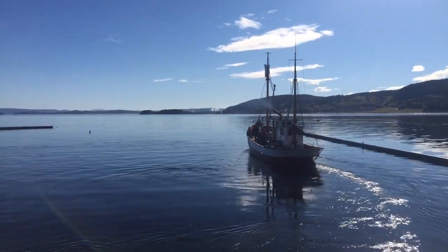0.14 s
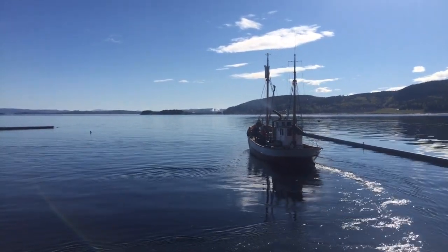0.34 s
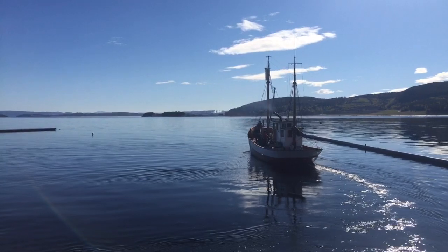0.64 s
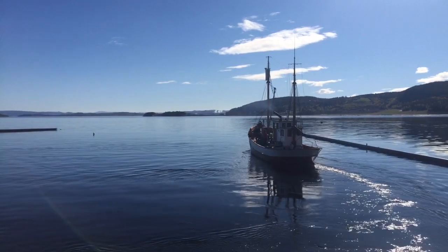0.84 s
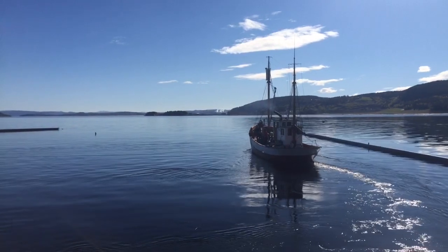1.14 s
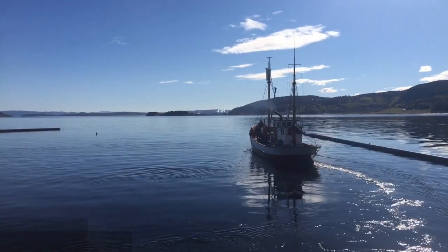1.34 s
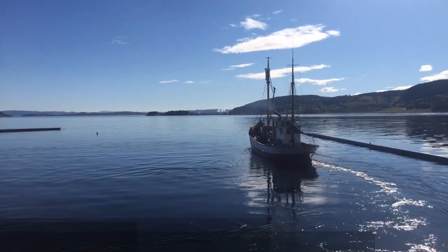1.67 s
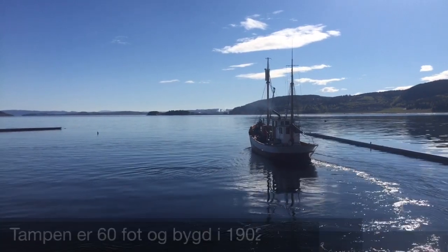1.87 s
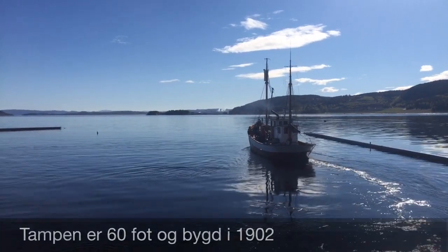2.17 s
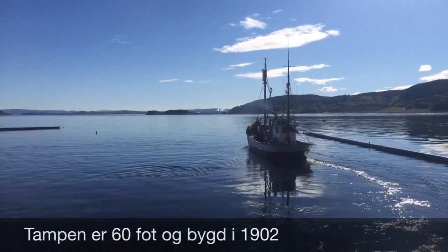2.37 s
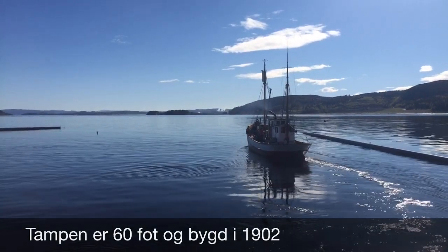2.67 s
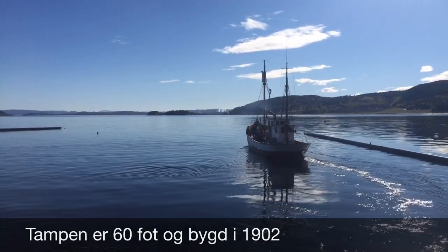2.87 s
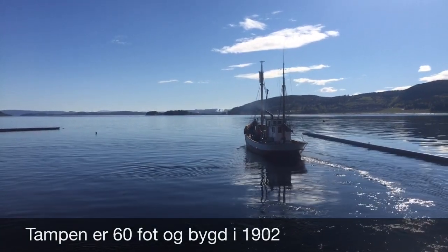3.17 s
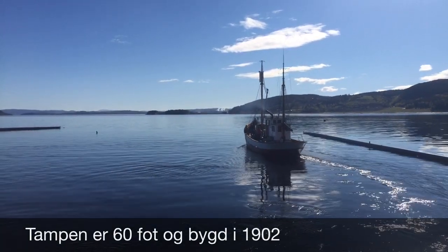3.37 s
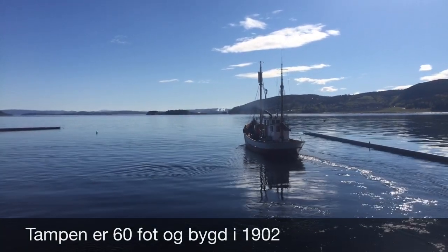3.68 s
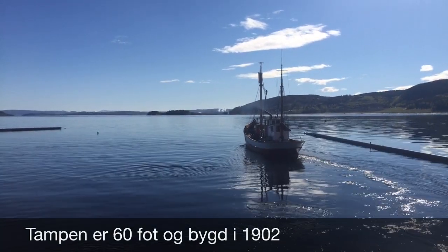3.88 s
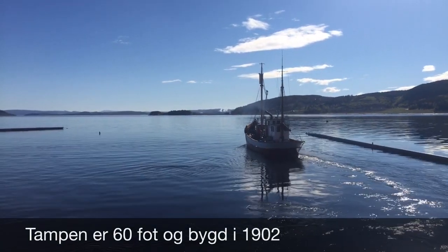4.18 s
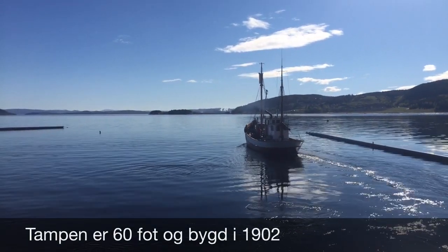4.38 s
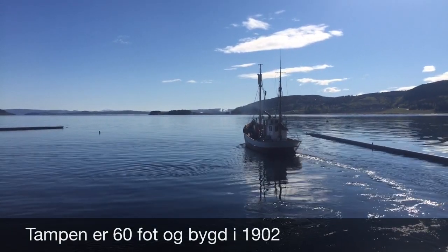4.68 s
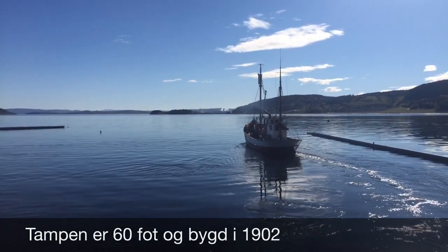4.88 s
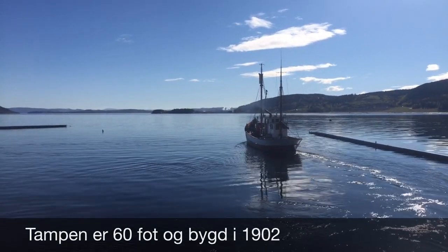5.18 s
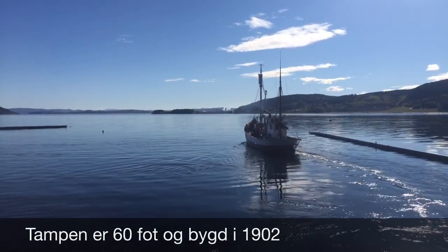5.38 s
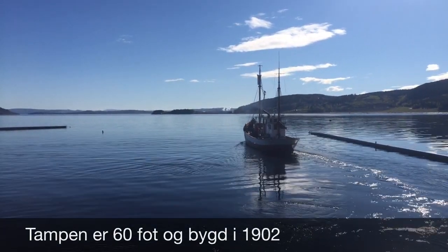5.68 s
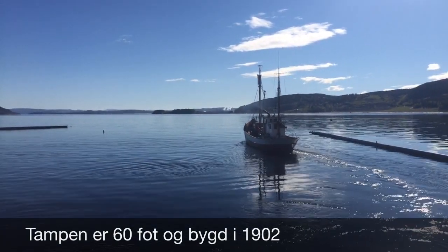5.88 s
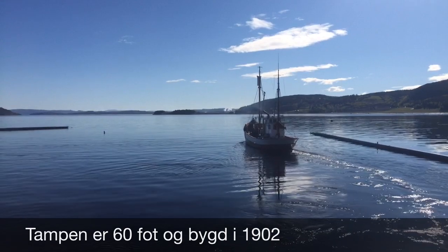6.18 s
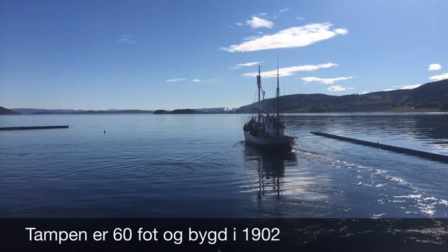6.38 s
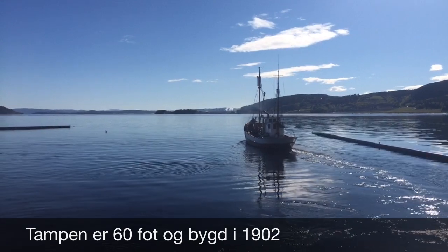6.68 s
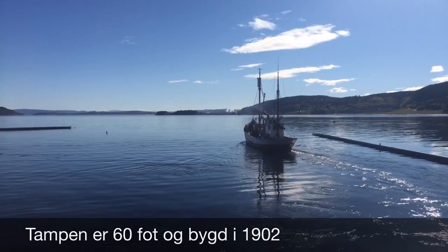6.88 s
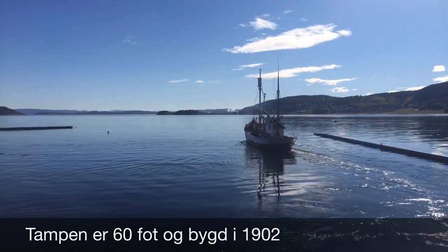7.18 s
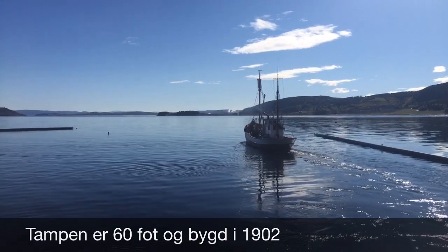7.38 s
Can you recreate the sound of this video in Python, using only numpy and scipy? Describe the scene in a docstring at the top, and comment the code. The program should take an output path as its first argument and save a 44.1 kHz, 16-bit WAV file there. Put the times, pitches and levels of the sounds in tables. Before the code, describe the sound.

An old two-cylinder boat engine knocks steadily, hollow thud and iron clank, slowly receding over calm water with a faint fizzing wake.

```python
"""An old two-cylinder hot-bulb engine knocks evenly in a wooden fishing boat moving off over calm water. From
the start filtered noise makes gear churn, wake fizz and faint hiss; puffs keep the exhaust pipe booming. The
cylinders fire in turn: shaped noise swells into a hollow thud, an iron clank and a short crack, which repeat in
quick echoes and echo off the water. Splashes soon join, and a pump ticks once a revolution. The water echo
closes in and the knock's colour slowly rises; late on, one small wave spills over with a hiss."""
import sys
import numpy as np
from scipy import signal
from scipy.fft import rfft, irfft, next_fast_len
from scipy.io import wavfile
from scipy.ndimage import uniform_filter1d

SR = 44100
rng = np.random.default_rng(int(sys.argv[2]) if len(sys.argv) > 2 else 0)


def pcm_store(signal):
    """Save signal as 16-bit PCM."""
    levels = np.round(np.clip(np.atleast_2d(signal), -1, 1) * 32767)
    wavfile.write(sys.argv[1], SR, levels.astype(np.int16).T)


N = 332073
RUN_IN = SR  # samples of sound made ahead of time zero and cut off at the end
KNOCK_LENGTH = 8192  # samples in one short sound
TIME = np.arange(-RUN_IN, N) / SR  # seconds

# The small blows inside one firing. Each row: delay in seconds, then the relative strength in dB
# of the blow in the swell, the thud, the clank and the crack.
BLOWS = [(-.02, 7.5, -44, -27, -40), (-.006, 1, -7, -52, -25), (.001, -30, -0.5, 5.5, 4),
         (.0055, -30, 2, 2.5, 2), (0.038, -40, -4.5, -8, -36)]
# Bright colour of the crack and the pump tick. Each row: frequency in Hz, strength in dB per Hz.
CRACK_COLOUR = [(1800, -1), (2400, 8.5), (3200, 4.5), (4300, 6), (5000, 0), (5900, -17), (8000, -17),
                (14000, -69)]
# Bright colour of splashing water. Each row: frequency in Hz, strength in dB per Hz.
SPLASH_COLOUR = [(3000, -10), (4500, 8), (6000, -7), (8000, 8), (10000, -14), (12000, -13), (15500, -24)]


def from_db(db):
    """Turn decibels into a gain."""
    return 10 ** (np.asarray(db) / 20)


def rms_one(x):
    """Scale each row to an rms (average strength) of 1."""
    return x / np.sqrt(np.mean(x ** 2, axis=-1, keepdims=True) + 1e-20)


def level(curve):
    """Gain over time, in straight dB lines between rows of (seconds, dB)."""
    seconds, db = np.transpose(curve)
    return from_db(np.interp(TIME, seconds, db))


def coloured(x, spectrum, peak_hz=1000, width_hz=100, peak_db=0):
    """Filter x to a given spectrum, with one resonance on top, and scale it to rms 1."""
    length = x.shape[-1]
    size = next_fast_len(length)
    hz = np.maximum(np.fft.rfftfreq(size, 1 / SR), 1)
    points, dbs = np.transpose(spectrum)
    shape_db = np.interp(np.log(hz), np.log(points), dbs)
    # beyond its two ends the spectrum falls away steeply
    low_skirt = np.minimum(hz / points[0], 1) ** 2
    high_skirt = np.minimum(points[-1] / hz, 1) ** 4
    resonance = 1 + (from_db(peak_db) - 1) / np.hypot(1, 2 * (hz - peak_hz) / width_hz)
    gain = from_db(shape_db) * low_skirt * high_skirt * resonance
    return rms_one(irfft(rfft(x, size) * gain, size)[..., :length])


def drift(rate):
    """Random wandering: straight lines between `rate` random points a second, points of spread 1."""
    knots = rng.standard_normal(4096)
    return np.interp((TIME - TIME[0]) * rate, np.arange(len(knots)), knots)


def firings(count=48, lead_count=6):
    """Time and cylinder of every firing; the engine is already running and gains a little speed."""
    first_s, beat_s = .1148, .1586  # first firing, and time to the next
    quickening_s = .000091  # how much shorter each beat is than the last
    stroke = np.arange(-lead_count, count)
    return first_s + beat_s * stroke - quickening_s * stroke ** 2 / 2, stroke % 2


def place(rows, times):
    """Lay one short sound at each time, adding where they overlap."""
    out = np.zeros(len(TIME) + 2 * KNOCK_LENGTH)
    starts = np.round(times * SR).astype(int) + RUN_IN
    for row, start in zip(rows, starts):
        out[start:start + len(row)] += row
    return out[:len(TIME)]


def rattle(count, alike):
    """Noise for each firing; each one partly repeats the one before."""
    alike = np.clip(alike, 0, .97)
    rows = rng.standard_normal((count, KNOCK_LENGTH))
    for k in range(1, count):
        rows[k] = alike * rows[k - 1] + np.sqrt(1 - alike ** 2) * rows[k]
    return rows


def over_water(x):
    """The calm surface mirrors the sound; the detour shrinks as the distance grows."""
    start_lag_s, echo_db = 0.00335, -8.5
    receding_per_s = 0.059  # share of the starting distance added each second
    lag_s = start_lag_s / (1 + receding_per_s * TIME)
    return x + from_db(echo_db) * np.interp(TIME - lag_s, TIME, x)


def gear():
    """Running gear and propeller churn as wavering noise; its colour shifts as the boat moves off."""
    # Colour of the churn. Each row: frequency in Hz, strength near in dB per Hz, strength far in dB per Hz.
    churn_colour = np.array([(40, -18, -28), (60, -33, -8.5), (89, -15, -7), (121, -1, -13),
                             (176, 0.5, 4.5), (320, -3.5, -4.5), (327, 2.5, -11), (373, -13.5, -13),
                             (534, -4.5, -9.5), (653, -2.5, -6.5), (883, -11.5, -12), (1320, -9.5, -12),
                             (2020, -16.5, -17.5), (2250, -29, -29.5), (3500, -39, -36)])
    # Loudness of the churn. Each row: time in seconds, level in dB before a 2 dB cut.
    churn_curve = [(0.0, -28), (1.64, -30), (2.64, -29.5), (5.16, -30.5), (7.53, -32)]
    away = np.clip(TIME / TIME[-1], 0, 1)
    stirring = rng.standard_normal(len(TIME)) * from_db(2.0 * drift(90))
    near = coloured(stirring, churn_colour[:, :2])
    far = coloured(stirring, churn_colour[:, ::2])
    return from_db(-2.0) * level(churn_curve) * ((1 - away) * near + away * far)


def exhaust(uneven_db=3.5, gust_s=0.0027):
    """Puffs ring the pipe, whose nearly even modes make each puff return about every 26 ms."""
    # Ringing tones of the pipe. Each row: frequency in Hz, level near in dB, level far in dB,
    # time to die by 60 dB in seconds, strength of turbulent noise driving the tone in dB.
    pipe_modes = [(44.25, -63, -56.5, 1.8, -32), (76.56, -40, -53.5, 0.76, -36),
                  (114.14, -41, -34.5, 0.76, -43), (153.2, -50.5, -39, 0.56, 7.5),
                  (189, -40, -54, 0.88, -11), (230.2, -32, -50, 0.36, -11.5), (281, -32, -34, 0.17, -15),
                  (292.4, -32.5, -44, 0.18, 10.5), (336.5, -49.5, -42.5, 0.38, 9.5),
                  (453.5, -51.5, -40, 0.12, 9.5), (555.6, -32.5, -43, 0.2, 3.5), (607, -47, -36, 0.33, 0),
                  (704, -42, -47, 0.09, -7)]
    # Puffs around each firing. Each row: delay in seconds, strength in dB before random unevenness.
    puff_rows = [(-.006, -3.5), (.02, -4), (.046, -1)]
    crank, _ = firings()
    delays, puff_db = np.transpose(puff_rows)
    chance = rng.uniform(-0.93, 1, (len(crank), len(puff_rows)))
    force = from_db(puff_db + uneven_db * chance)
    puffs = place(force.reshape(-1, 1), (crank[:, None] + delays).ravel())
    # each puff drags a short gust of turbulent gas behind it
    fade = np.exp(-1 / (gust_s * SR))
    gusts = np.sqrt(signal.lfilter([1 - fade], [1, -fade], puffs ** 2 + 1e-18))
    away = np.clip(TIME / TIME[-1], 0, 1)
    out = 0
    for hz, near_db, far_db, t60, turbulence_db in pipe_modes:
        drive = puffs + from_db(turbulence_db) * gusts * rng.standard_normal(len(TIME))
        shrink = from_db(-60 / (t60 * SR))  # loss per sample
        turn = 2 * np.pi * hz / SR  # angle per sample
        top = [1, -shrink * np.cos(turn)]
        bottom = [1, -2 * shrink * np.cos(turn), shrink * shrink]
        ring = signal.lfilter(top, bottom, drive)
        out = out + ring * from_db(near_db + (far_db - near_db) * away)
    # a puff is soft-edged
    return signal.sosfilt(signal.butter(3, 900, fs=SR, output="sos"), out)


def wake():
    """Foam fizzes behind the stern as wavering noise, with single droplets ticking out of it."""
    # Colour of the fizz. Each row: frequency in Hz, strength in dB per Hz.
    fizz_colour = [(1800, -3), (2400, 2.5), (3100, -6.5), (3800, 1.5), (4400, 4), (5100, -2.5), (6000, -13),
                   (6900, -7), (7800, -4), (9700, -15), (12000, -15), (14000, -20), (16000, -28)]
    # Loudness of the fizz. Each row: time in seconds, level in dB before an 8 dB lift.
    fizz_curve = [(0.0, -54), (1.53, -56.5), (1.72, -58.5), (2.2, -61.5), (2.81, -56.5), (3.1, -57.5),
                  (4.19, -55), (5.28, -61), (6.12, -57.5), (6.98, -61.5), (7.53, -59)]
    foam = rng.standard_normal(len(TIME)) * from_db(1.9 * drift(60))
    drops = droplets(per_s=1100, spread_db=5.5, cycles=37)
    return from_db(8.0) * level(fizz_curve) * coloured(foam + from_db(-7.5) * drops, fizz_colour)


def droplets(per_s, spread_db, cycles, count=18):
    """Tiny bubbles burst at random, each ringing briefly at one of `count` pitches; cycles is sharpness."""
    burst_count = int(per_s * len(TIME) / SR / count)
    out = 0
    for hz in np.geomspace(3000, 14500, count):
        when = rng.uniform(TIME[0], TIME[-1], burst_count)
        sizes = from_db(spread_db * np.minimum(rng.exponential(1, burst_count), 4))
        bursts = place(sizes[:, None], when) + 1e-18
        out = out + signal.lfilter(*signal.iirpeak(hz, cycles, fs=SR), bursts)
    return rms_one(out)


def air(air_db=-69):
    """A faint steady hiss of plain noise lies under everything."""
    return from_db(air_db) * rng.standard_normal(len(TIME))


def engine():
    """Every firing swells, thuds in the hull, clanks in the iron and cracks at the top."""
    # Colour of the swell and thud. Each row: frequency in Hz, strength in dB per Hz.
    thud_colour = [(200, -48), (290, -0.5), (390, -30), (460, 1), (540, -6.5), (690, -1), (800, -7),
                   (930, -8.5), (1300, -12.5)]
    # Colour of the clank. Each row: frequency in Hz, strength in dB per Hz.
    clank_colour = [(700, -53), (950, -11.5), (1070, 6), (1160, -4.5), (1300, 7), (1420, 0.5), (1550, 3.5),
                    (1750, 2.5), (2000, 2), (2250, -10), (2800, -25)]
    crank, cylinder = firings()
    count = len(crank)
    late, thud_chance, clank_chance = rng.standard_normal((count, 3)).T
    times = crank + .0004 * late  # ignition jitter in seconds
    swell_db, thud_db, clank_db, crack_db = firing_levels(times, cylinder)
    # strongest ring in Hz: pitch at time zero, climb per second, scatter from firing to firing
    swell_hz = 609 + 13.6 * times
    thud_hz = 663 + 20.8 * times + 24 * thud_chance
    clank_hz = 1415 + 28.5 * times + 171 * clank_chance
    hollow = coloured(rattle(count, alike=0.97), thud_colour, swell_hz[:, None], width_hz=35, peak_db=30)
    wood = coloured(rattle(count, alike=0.75), thud_colour, thud_hz[:, None], width_hz=42, peak_db=13)
    iron = coloured(rattle(count, alike=0.71), clank_colour, clank_hz[:, None], width_hz=55, peak_db=9)
    snap = coloured(rattle(count, alike=0.23), CRACK_COLOUR)
    _, swell_blows, thud_blows, clank_blows, crack_blows = np.transpose(BLOWS)
    # seconds around the firing in which each level holds
    before, after = (-.023, -.001), (-.003, .027)
    swell = knock(times, swell_db, hollow, swell_blows, before, rise_s=0.0076, decay_s=0.01,
                  tail_db=-25, tail_s=0.009, uneven_db=8, echo_db=-22)
    # the thud starts just ahead of the clank
    thud = knock(times - 0.001497, thud_db, wood, thud_blows, after, rise_s=0.0023, decay_s=0.0023,
                 tail_db=-13.5, tail_s=0.022, uneven_db=2, echo_db=-12.5)
    clank = knock(times, clank_db, iron, clank_blows, after, rise_s=0.0024, decay_s=0.018,
                  tail_db=-8.0, tail_s=0.022, uneven_db=1.5, echo_db=-15.0)
    crack = knock(times, crack_db, snap, crack_blows, after, rise_s=0.00091, decay_s=0.0074,
                  tail_db=-5, tail_s=0.018, uneven_db=0, echo_db=-14.5)
    return swell + thud + clank + crack


def firing_levels(times, cylinder):
    """Part levels in dB: each cylinder has its own balance, fades with distance and burns unevenly."""
    # The two cylinders at time zero. Each row: swell, thud, clank and crack level in dB.
    cylinder_db = np.array([(-36.5, -23, -25, -39), (-31.5, -22.5, -24.5, -45.5)])
    # Fading as the boat leaves, one row per cylinder (a negative number grows instead).
    # Each row: swell, thud, clank and crack loss in dB per second.
    fade_rates = np.array([(1.7, 1.14, 0.08, 0.55), (1.2, 0.76, 0.69, -0.14)])
    # Firings that burn harder or softer than the rest.
    # Each row: time in seconds (the nearest firing is meant), thud, clank and crack change in dB.
    odd_firings = [(.27, -4.5, 1.5, 2), (.43, -1.5, 3, 1), (.91, -5.5, -2, 0), (1.70, -4, 1.5, -1),
                   (2.17, -2.5, -3, 0), (2.33, -3, -4, -2), (2.49, 2, 0.5, -1), (3.27, 3, 0.5, -0.5),
                   (3.43, -6, 3, 0.5), (3.58, -3, -4, 4), (3.74, -2.5, 0.5, 4), (4.83, 3.5, 1.5, 0),
                   (4.99, 2, -1.5, 4), (5.61, -5.5, 1, -2.5), (5.92, 3, 1, -0.5), (6.08, -4, -1, -0.5),
                   (6.23, 1.5, 0.5, 2), (7.01, 5.5, 1.5, 0.5), (7.16, -1.5, -1.5, -0.5), (7.32, 6, 0, 2)]
    db = cylinder_db[cylinder] - fade_rates[cylinder] * times[:, None]
    for seconds, *odd_db in odd_firings:
        nearest = np.argmin(np.abs(times - seconds))
        db[nearest] += (0, *odd_db)
    uneven_db = 0.95 * rng.standard_normal(db.shape)
    return (db + uneven_db).T


def knock(times, level_db, ringing, blow_db, span, rise_s, decay_s, tail_db, tail_s, uneven_db, echo_db):
    """Quick blows, each dying fast into a longer tail, with a repeating echo; level_db is the rms over span."""
    lead = .03  # seconds kept free ahead of the firing
    age = np.arange(KNOCK_LENGTH) / SR - lead
    since = np.maximum(age - np.array(BLOWS)[:, :1], 0)
    rise = 1 - np.exp(-since / rise_s)
    fall = np.exp(-since / decay_s) + from_db(tail_db) * np.exp(-since / tail_s)
    blows = rise * fall
    # the hardest blows vary most from one firing to the next
    chance = rng.uniform(-1, 1, (len(times), len(BLOWS)))
    force = from_db(blow_db + uneven_db * from_db(blow_db / 2) * chance)
    # even out the noise, so that a struck body rings down without swelling again
    power = np.abs(uniform_filter1d(ringing ** 2, size=700, axis=1))
    steady = ringing / np.sqrt(power + 1e-9)
    rows = steady * np.sqrt(force ** 2 @ blows ** 2)
    # each echo is echoed again, about every 19 ms, weaker every time
    lag = round(.0194 * SR)
    for start in range(lag, KNOCK_LENGTH - lag, lag):
        rows[:, start:start + lag] += from_db(echo_db) * rows[:, start - lag:start]
    inside = (age > span[0]) & (age < span[1])
    strength = np.sqrt(np.mean(rows[:, inside] ** 2, axis=1))
    return place(rows * (from_db(level_db) / strength)[:, None], times - lead)


def splashes(decay_s=0.0036):
    """Larger drops fall back with a short bright spatter of dying noise."""
    # Drops thrown up by the wake. Each row: start in seconds, peak level in dB before a 3.5 dB lift.
    splash_rows = [(0.1446, -41), (0.632, -34), (0.861, -32.5), (1.1538, -40), (1.3643, -37), (1.7764, -45),
                   (1.8754, -41), (2.1889, -42), (3.2295, -41), (4.2453, -39)]
    times, peak_db = np.transpose(splash_rows)
    spatter = coloured(rng.standard_normal((len(times), KNOCK_LENGTH)), SPLASH_COLOUR)
    spatter = spatter * np.exp(-np.arange(KNOCK_LENGTH) / (SR * decay_s))
    gain = from_db(peak_db + 3.5) / np.abs(spatter).max(axis=1)
    return place(spatter * gain[:, None], times)


def pump(delay_s=0.091, pump_db=-41, ring_hz=4330, decay_s=0.0022):
    """The fuel pump makes a small steel tick of ringing noise between knocks, once a revolution."""
    times, cylinder = firings()
    times = times[cylinder == 0] + delay_s
    ticks = coloured(rattle(len(times), alike=0.19), CRACK_COLOUR, ring_hz, width_hz=500, peak_db=26)
    ticks = ticks * np.exp(-np.arange(KNOCK_LENGTH) / (SR * decay_s))
    peak = from_db(pump_db + 1.8 * rng.standard_normal(len(times)))
    return place(ticks * (peak / np.abs(ticks).max(axis=1))[:, None], times)


def spill(middle_s=5.67, half_s=.035, spill_db=-55):
    """A small wave spills over: bright noise swells and sinks in a brief bell shape."""
    bell = np.exp(-((TIME - middle_s) / half_s) ** 2 / 2)
    return from_db(spill_db) * bell * coloured(rng.standard_normal(len(TIME)), SPLASH_COLOUR)


def scene():
    """The boat and its wake, heard from the shore."""
    boat = over_water(engine() + pump() + gear()) + exhaust()
    mix = boat + wake() + splashes() + spill() + air()
    return mix[None, RUN_IN:]


def record(dry):
    """The microphone drops the deepest bass below 39 Hz; the top is cut steeply at 15850 Hz."""
    thin = signal.sosfilt(signal.butter(8, 39, "high", fs=SR, output="sos"), dry)
    return signal.sosfilt(signal.ellip(12, .1, 80, 15850, fs=SR, output="sos"), thin)


dry = scene()
out = record(dry)
pcm_store(out)
```